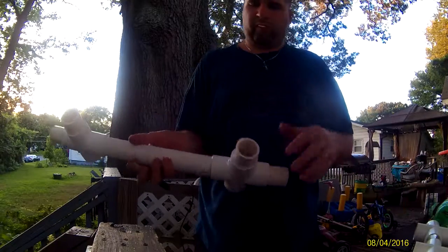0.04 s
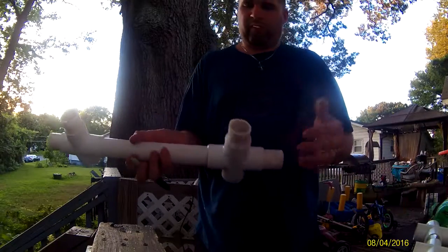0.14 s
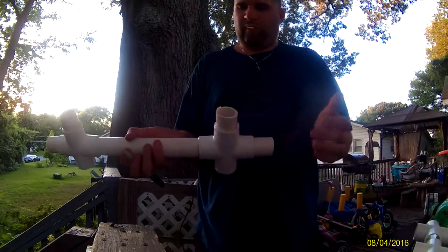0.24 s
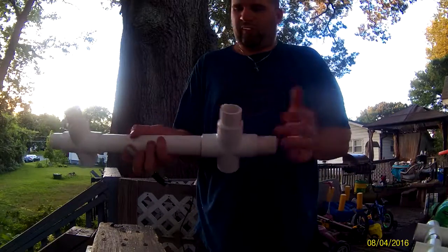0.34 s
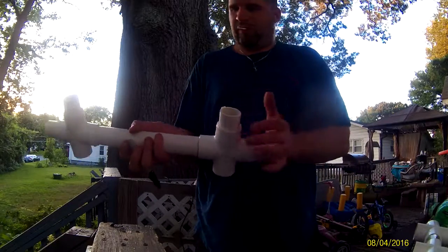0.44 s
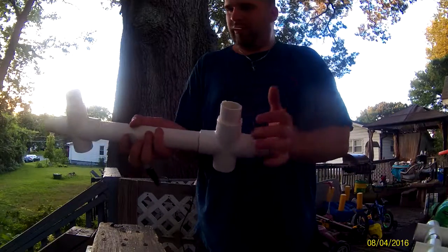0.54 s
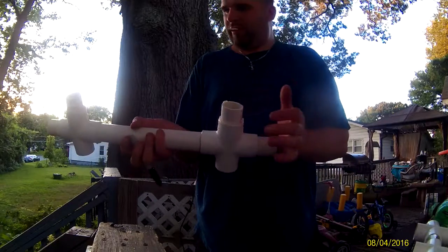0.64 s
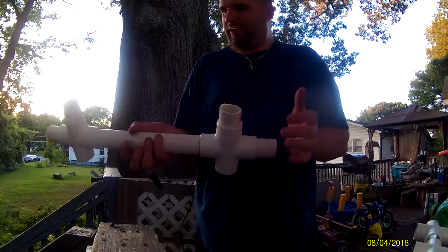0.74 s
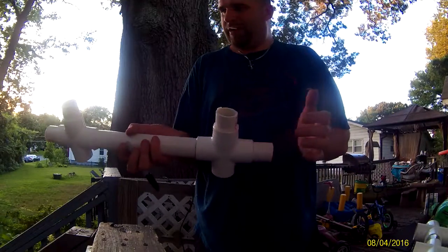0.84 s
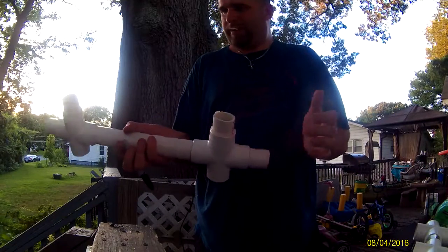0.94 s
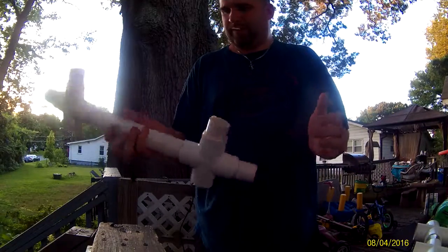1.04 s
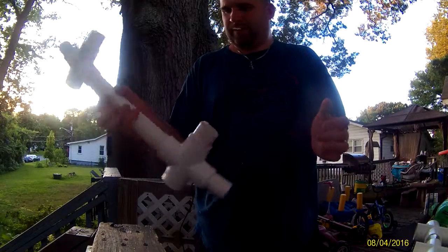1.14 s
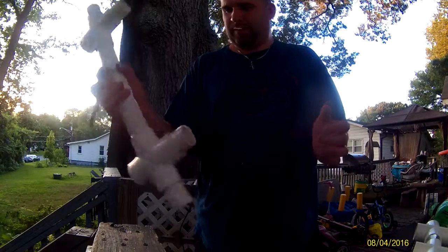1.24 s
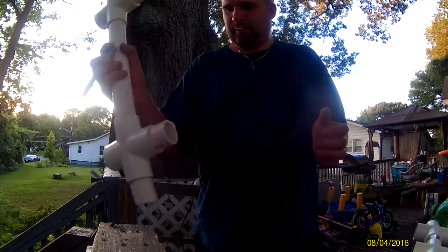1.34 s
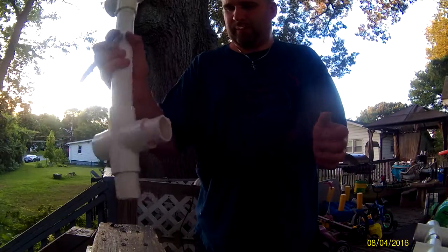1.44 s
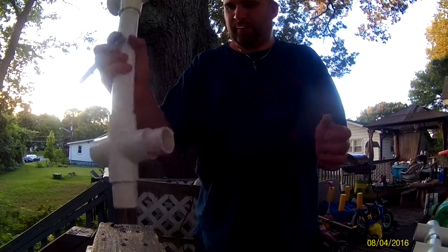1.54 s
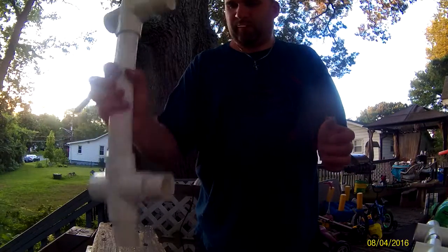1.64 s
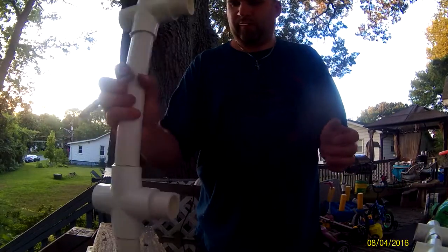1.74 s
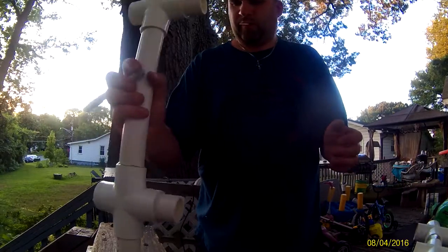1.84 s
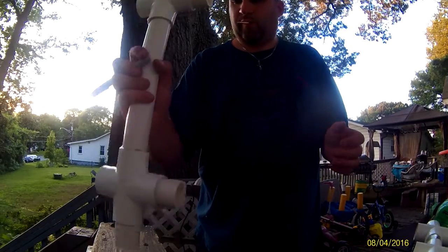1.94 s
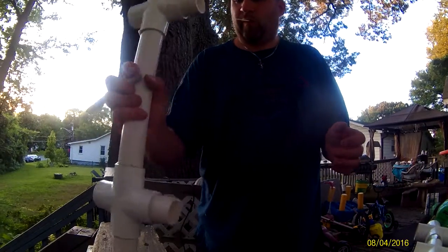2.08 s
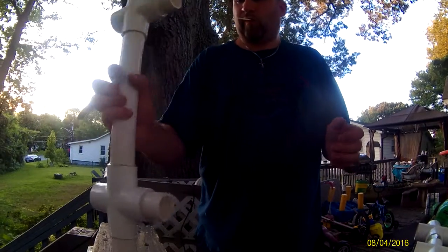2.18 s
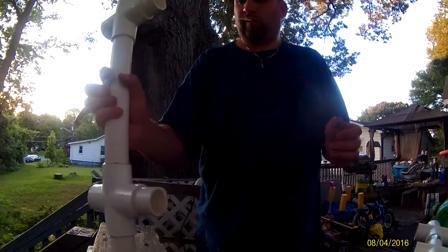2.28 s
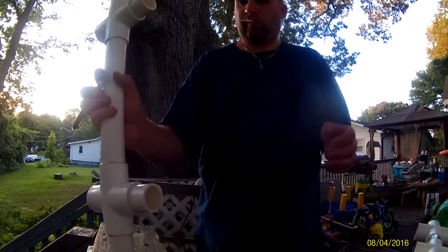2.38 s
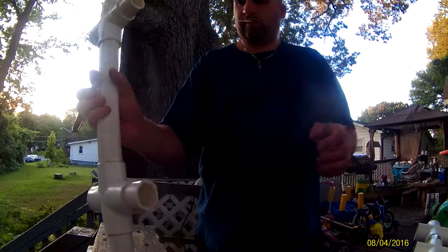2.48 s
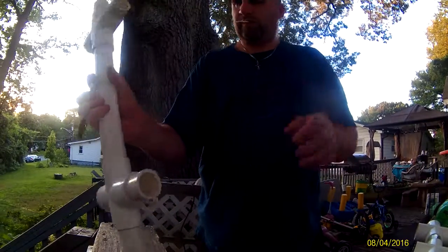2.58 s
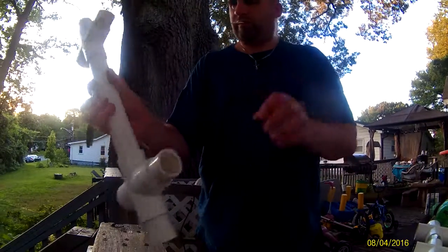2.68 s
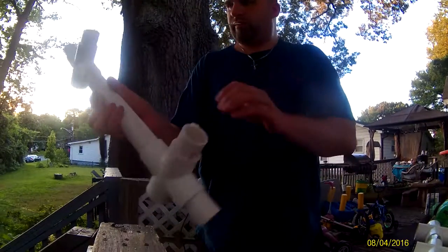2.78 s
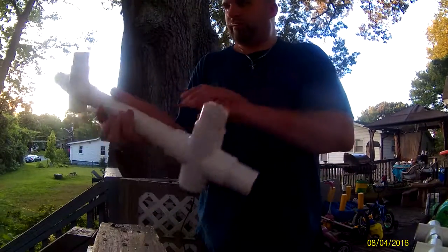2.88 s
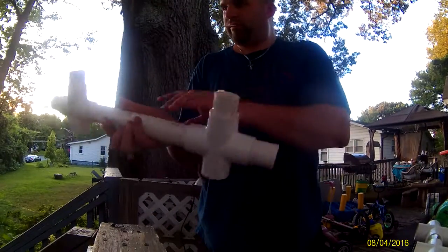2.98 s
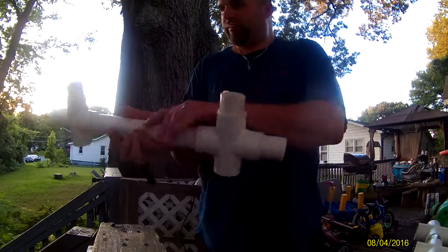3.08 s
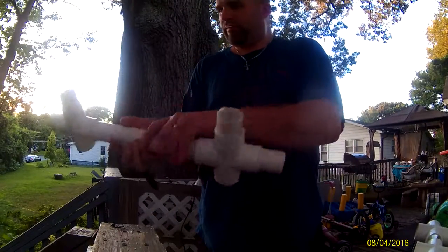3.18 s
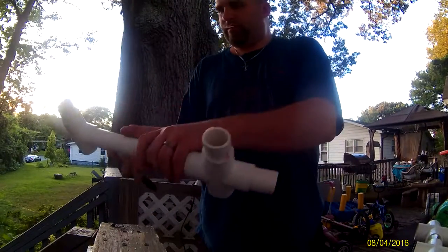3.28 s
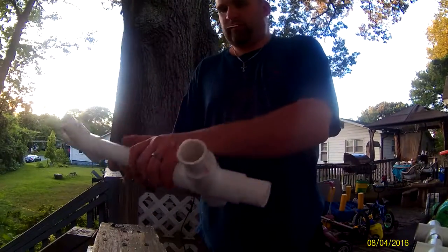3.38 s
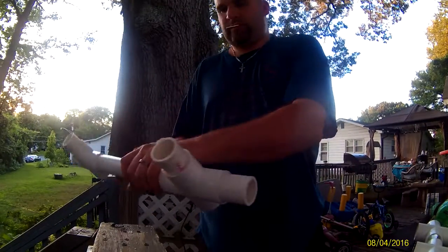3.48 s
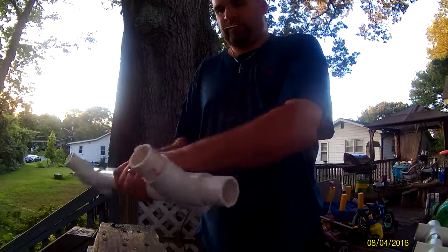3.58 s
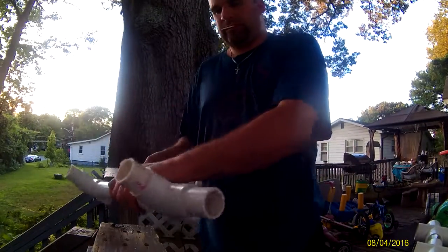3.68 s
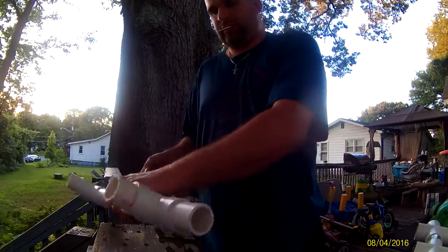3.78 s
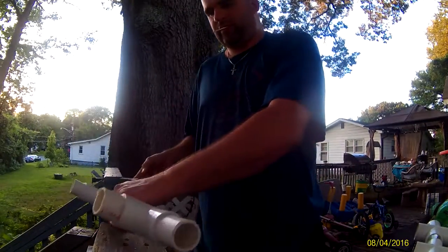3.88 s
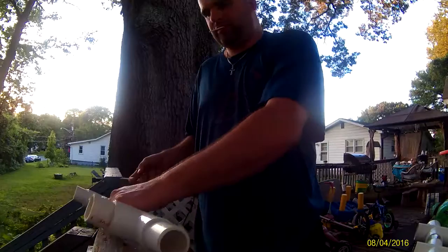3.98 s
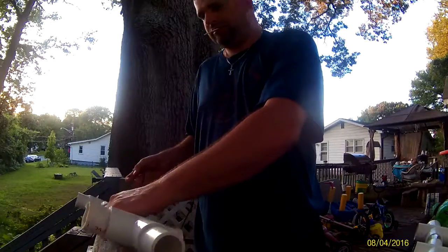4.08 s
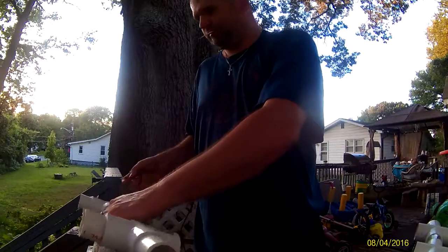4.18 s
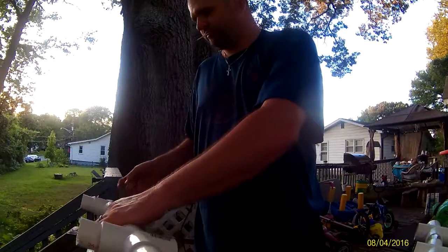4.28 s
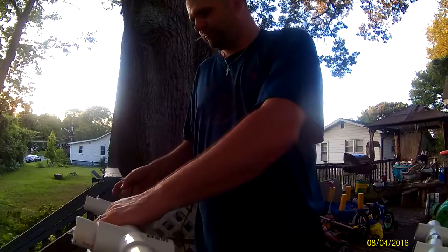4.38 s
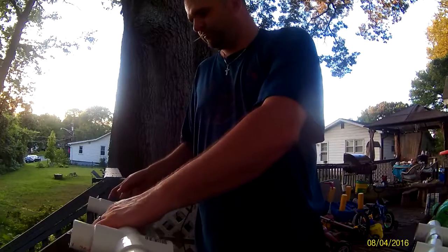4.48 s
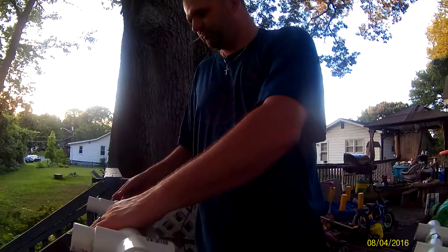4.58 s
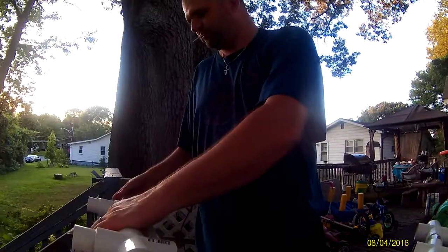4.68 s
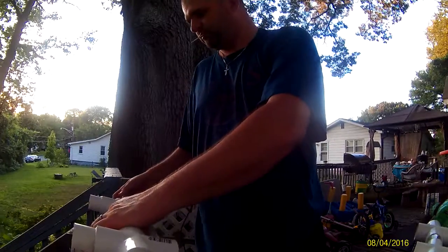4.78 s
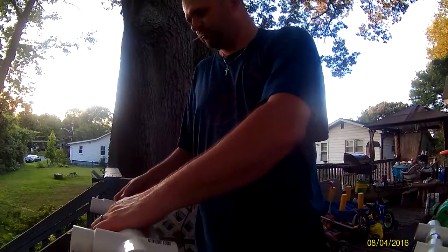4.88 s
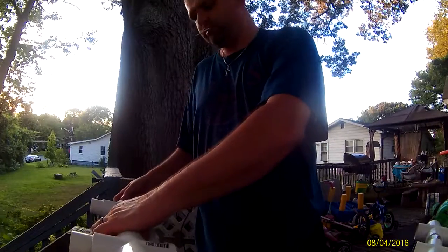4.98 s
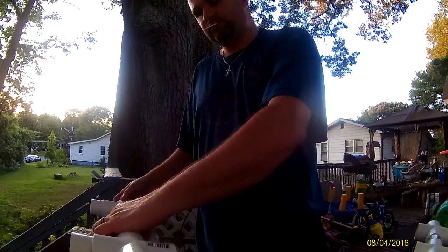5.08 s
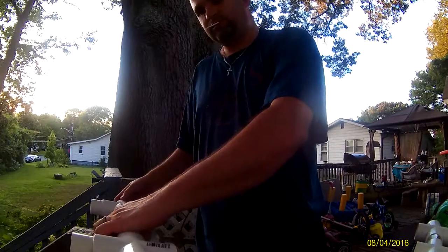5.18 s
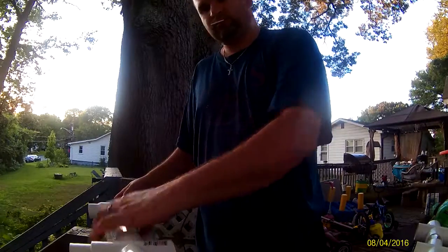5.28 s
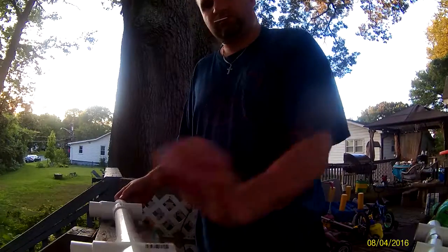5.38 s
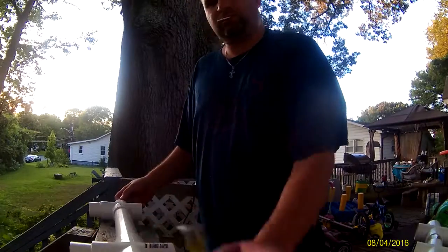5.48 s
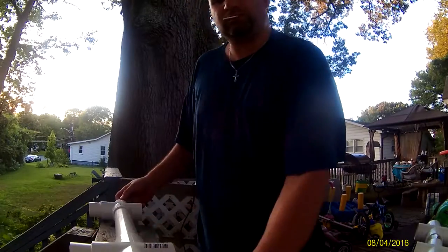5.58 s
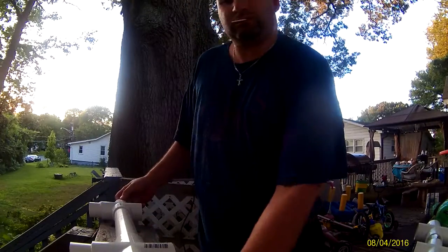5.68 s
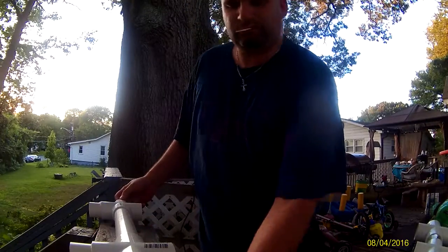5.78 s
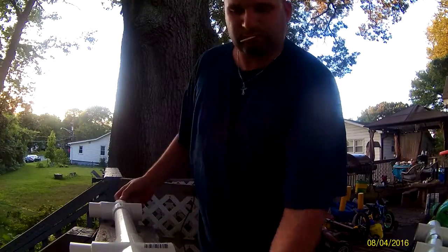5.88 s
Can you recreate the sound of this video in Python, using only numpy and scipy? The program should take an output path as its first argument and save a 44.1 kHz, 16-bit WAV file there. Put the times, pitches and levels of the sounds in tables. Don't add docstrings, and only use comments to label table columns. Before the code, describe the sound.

A hollow plastic pipe frame is patted, banged twice hard on a wooden bench, then laid down and nudged as thin plastic crinkles and insects sing.

```python
import sys
import numpy as np
from scipy import signal
from scipy.fft import rfft, irfft
from scipy.io import wavfile
from scipy.ndimage import uniform_filter1d

SR = 44100
rng = np.random.default_rng(int(sys.argv[2]) if len(sys.argv) > 2 else 0)


def natural_amplitude(level_db):
    exponent = np.asarray(level_db, float) / 20
    return 10 ** exponent


def dump_mix(stems):
    frames = np.atleast_2d(stems).T
    limited = np.clip(frames, -1, 1)
    pcm = np.round(limited * 32767).astype(np.int16)
    wavfile.write(sys.argv[1], SR, pcm)


N = 261557

# pitch_hz, level_db (per Hz)
YARD_COLOUR = [(12, -40), (20, -9.5), (58, 1), (146, -7.5), (248, -7.5), (293, -12), (642, -15.5),
               (897, -19.5), (1030, -20), (4940, -32), (6720, -23.5), (7520, -30.5), (9950, -31.5),
               (13500, -30), (16000, -34)]
# pitch_hz, width_hz, level_db
CHORUS_BANDS = [(6730, 520, 0), (5900, 800, -8.5)]
# throbs_per_s, first_crest_s, depth_db
THROBS = [
    (3.36, .29, 2.6),
    (2.65, .31, 1.3),
]
# start_s, length_s, pitch_hz, level_db
BUZZES = [
    (0.994, 0.15, 7100, -63.5),
    (1.335, .03, 7560, -68),
    (3.33, .06, 8330, -78),
    (3.901, 0.12056, 7460, -67.5),
]
# start_s, length_s, low_hollow_db, upper_hollow_db
DRAGS = [
    (4.81, 0.089, -53, -73),
    (5.06, 0.08, -65, -65.5),
    (5.2, 0.092, -54, -70.5),
    (5.46, 0.067, -58, -75),
    (5.54, 0.41, -64, -62.5),
    (5.79, 0.26, -45.5, -54.5),
]
# pitch_hz, width_hz, level_db
HOLLOWS = [
    [(161.4, 118, 0.5), (323, 47.15, -4), (420, 79, -2.5), (628, 253.4, -8)],
    [(1280, 72, 7.5), (1464, 230, 11.5)],
]
# start_s, peak_db, brightness_db (above 8 kHz), t60_s
CRINKLES = [(4.7852, -37, -2, 0.046), (4.9597, -53, 5.5, 0.022), (4.977, -31.5, -32, 0.043),
            (5.1323, -10.5, -29.5, 0.037), (5.1385, -33, -15, 0.036), (5.1616, -47, -7, 0.057),
            (5.1975, -44, -17.5, 0.043), (5.4545, -33.5, -35, 0.042), (5.5047, -46.5, 7.5, 0.052),
            (5.5267, -38, -8, 0.043), (5.5384, -40, 1.5, 0.038), (5.5475, -43.5, 8, 0.051),
            (5.5676, -39.5, 4.5, 0.04), (5.584, -34, 4, 0.028), (5.5968, -28.5, -1, 0.038),
            (5.628, -43, -9, 0.049), (5.6424, -42, -4.5, 0.11), (5.7079, -46.5, 1.5, 0.087),
            (5.8106, -29, -8, 0.099), (5.8286, -48.5, -18, 0.11), (5.8626, -32, -11.5, 0.13),
            (5.8844, -47, -1, 0.083), (5.9074, -55, 4, 0.0727), (5.9244, -57.5, 16, 0.02)]
# start_s, length_s, level_db
RUSTLES = [
    (5.12, 0.098, -47.5),
    (5.53, .2, -44.5),
    (5.72, 0.19, -56.5),
]
# pitch_hz, level_db (per Hz)
FILM_COLOUR = [(350, -2.5), (600, -14), (1130, -0.5), (1660, 1), (3210, -10.5), (6550, -24), (8740, -33),
               (15100, -32), (16000, -44)]
# start_s, peak_db, slap_db
PATS = [
    (0.4654, -28, -50.5),
    (0.4732, -48, -49),
]
# pitch_hz, level_db, t60_s
AIR_COLUMN = [(250, -6, .04), (447, 0, .25), (700, -2, .1), (900, -12, .05), (1152, -14, .1),
              (1400, -18, .04), (1700, -17, .04)]
# start_s, peak_db
CHATTER = [(1.7378, -15.5), (1.74, -32), (1.7428, -29), (1.7495, -23.5), (1.7558, -30), (1.761, -14.5),
           (1.7649, -21), (1.7674, -34), (1.7704, -34.5), (2.0873, -12.5), (2.0932, -5), (2.0985, -23.5),
           (2.1, -28.5), (2.1049, -33), (2.1084, -18.5), (2.1141, -46), (2.127, -24.5), (2.1354, -32.5),
           (2.1444, -43), (2.1474, -32), (2.1517, -36.5), (5.2747, -55), (5.2876, -50)]
# pitch_hz, level_db, t60_s
FITTING = [(3700, -6, .009), (4900, 0, .011), (5600, -4, .009), (6500, -4, .009), (8100, -2, .009),
           (9200, -8, .008), (10300, -8, .007), (11800, -10, .006)]
# start_s, level_db, colour_centre_hz
RINGINGS = [
    (1.74, -.7, 600),
    (2.1, -3, 840),
]
# pitch_hz, level_db, t60_s
PIPE_TONES = [(366, -19, .12), (450, -21, .2), (453, -45, 1.1), (643, -29, .6), (1335, -35, .45),
              (1685, -31, .2)]
# start_s, peak_db, colour_centre_hz, decay_factor, tick_db
BLOWS = [
    (1.7250, 14, 480, 0.41, -31),
    (1.7290, 14.5, 2105, 0.42, -21.5),
    (1.7370, 12.5, 896, 0.49, -27.5),
    (2.0765, 20, 796, 0.32, -27),
    (2.081, 18, 1200, .45, -20),
    (2.087, 11, 420, .3, -30),
    (2.0919, 11, 1030, 0.34, -25),
]
# start_s, peak_db, colour_centre_hz, decay_factor, tick_db
REBOUNDS = [(1.756, 4, 400, 0.54, -32), (1.764, -13, 393, 0.52, -31.5), (1.77, -8, 458, 0.93, -35),
            (2.111, -11, 425, .6, -26.5), (2.123, -25, 466.2, .6, -21), (2.133, 5, 948, .45, -32),
            (2.142, -18, 900, .55, -24.5), (2.145, 3, 670, 0.37, -45), (2.15, -13, 510, 1, -18),
            (2.171, -9.5, 665, 0.28, -48), (2.183, -12, 650, 0.32, -48)]
# start_s, peak_db, colour_centre_hz, decay_factor, tick_db
SETTLING = [
    (4.195, -21.5, 774, 0.59, -37),
    (4.455, -46, 315, 0.781, -28.5),
    (4.484, -33, 420, 0.48, -32),
    (4.501, -24.5, 482, 0.39, -36),
    (4.53, -42, 436, 0.72, -30),
    (4.648, -36.5, 350, 0.74, -38),
    (4.859, -40, 322.5, 0.39, -22),
]
# start_s, peak_db, colour_centre_hz, decay_factor, tick_db
NUDGES = [(4.95, -14.5, 910, 0.51, -35), (4.983, -19, 506, 0.73, -40), (5.007, -22.5, 435, 0.65, -39),
          (5.123, -13.5, 567, 0.81, -26), (5.128, -6, 306, 0.71, -23), (5.155, -26.5, 1400, 0.643, -28),
          (5.177, -14, 564, 0.24, -32), (5.19, -28.5, 700, .6, -28), (5.269, 1.6, 605, 0.44, -33.5),
          (5.276, -18.5, 540, 1, -27), (5.283, -3, 690, 0.39, -36), (5.358, -12, 442, .6, -34),
          (5.382, -18.5, 450.4, 0.77, -36), (5.433, -16, 420, 1, -56), (5.455, -18.5, 595, 0.35, -41),
          (5.543, -27, 381, 0.37, -31), (5.565, -36.5, 600, 0.54, -42), (5.826, -23, 425, 0.41, -33.5),
          (5.851, -24, 608, 0.63, -31), (5.865, -24, 900, 0.39, -20), (5.887, -42, 500, 0.38, -31),
          (5.916, -34, 400, 0.56, -40)]
# bench_thud_db, colour_fall_db (per octave squared)
CONTACTS = [
    (-23, 1.6),
    (-32, 3.4),
    (-28, 4.6),
    (-29, 4.2),
]
# pitch_hz, level_db
BODY = [(295, 0.5), (400, -2.34), (505, 3), (600, -0.5), (730, 1), (870, -4), (985, -5.5), (1120, -2.5),
        (1240, -1.5), (1510, -1.5), (1640, -1), (1780, -9.5), (2000, -7.5), (2200, -9.5), (2480, -3.5),
        (2750, -11.5), (3080, -13), (3600, -16), (4200, -18.5)]
# pitch_hz, level_db, t60_s
BENCH_THUD = [(142, 0, .22), (165, -3, .2), (200, -2, .1)]


def evened(x):
    return x / np.sqrt(np.mean(x ** 2) + 1e-20)


def read(points, hz):
    table_hz, value = np.transpose(points)
    return np.interp(np.log(hz + 1), np.log(table_hz + 1), value)


def add(mix, start_s, sound):
    part = mix[round(start_s * SR):][:len(sound)]
    part += sound[:len(part)]


def bands(x, table):
    out, n = np.zeros(len(x)), np.arange(len(x))
    for hz, width_hz, db in table:
        turn = np.exp(2j * np.pi * hz * n / SR)
        r = np.exp(-np.pi * width_hz / SR)
        smooth = signal.lfilter([1], np.convolve([1, -r], [1, -r]), x / turn)
        out += natural_amplitude(db) * evened((turn * smooth).real)
    return evened(out)


def modes(table, length_s, shift_db=0, detune=1, phase=0):
    hz, db, t60 = (column[:, None] for column in np.transpose(table))
    t = np.arange(round(length_s * SR)) / SR
    tones = np.sin(2 * np.pi * (hz * detune * t + phase))
    sound = (natural_amplitude(db + shift_db - 60 * t / t60) * tones).sum(0)
    return sound / abs(sound).max()


def soft_start(sound, rise_s):
    return sound * np.minimum(np.arange(len(sound)) / (rise_s * SR), 1)


def crack(top_hz, t60):
    t = np.arange(900) / SR
    band = signal.butter(2, [1500, min(top_hz, 16000)], "band", fs=SR)
    return evened(signal.lfilter(*band, rng.standard_normal(len(t)))) * natural_amplitude(-60 * t / t60)


def strokes(rows, column):
    gain = np.zeros(N)
    for row in rows:
        add(gain, row[0], natural_amplitude(row[column]) * signal.windows.tukey(round(row[1] * SR), 0.63))
    return gain


def yard():
    frames, hz = N // 256 + 5, np.fft.rfftfreq(1024, 1 / SR)
    a, b, patches = rng.standard_normal((frames, 513, 3)).T
    patches = evened(uniform_filter1d(uniform_filter1d(patches, 10, 0), 12, 1))
    without_insects_hz = np.where(abs(hz - 6500) < 1300, 8500, hz)
    colour_db = np.minimum(read(YARD_COLOUR, hz), read(YARD_COLOUR, without_insects_hz) + 0.83)
    treble_db = 3.7 * (hz[:, None] / 16000) ** 2.9
    z = (a + 1j * b) * natural_amplitude(colour_db[:, None] + treble_db + .8 * patches)
    return natural_amplitude(-56.5) * evened(signal.istft(z, nperseg=1024, noverlap=768)[1][:N])


def insects():
    t = np.arange(N) / SR
    clicks = rng.standard_normal(N) * (0.65 + (rng.random(N) < 1500 / SR) * 0.62)
    throb_db = sum(db * np.cos(2 * np.pi * rate_hz * (t - crest_s)) for rate_hz, crest_s, db in THROBS)
    chorus_db = -66
    out = bands(clicks, CHORUS_BANDS) * natural_amplitude(chorus_db + throb_db)
    for start_s, length_s, hz, db in BUZZES:
        n = round(length_s * SR)
        buzz = bands(rng.standard_normal(n), [(hz, 450, 0), (0.84 * hz, 900, -4)])
        add(out, start_s, natural_amplitude(db) * buzz * signal.windows.tukey(n, .4))
    return out


def whine():
    whine_hz, flip_hz, whine_db = 13364, 41, -65.5
    t = np.arange(N) / SR
    waver = 2.5 * np.cumsum(evened(uniform_filter1d(rng.standard_normal(N), 3000))) / SR
    flips = uniform_filter1d(np.sign(np.sin(2 * np.pi * flip_hz * t)), 30)
    return natural_amplitude(whine_db + 3) * flips * np.sin(2 * np.pi * (whine_hz * t + waver))


def drag():
    out = np.zeros(N)
    for column, hollow in enumerate(HOLLOWS, 2):
        slips = rng.standard_normal(N) * (rng.random(N) < 500 / SR)
        slips += 0.038 * rng.standard_normal(N)
        out += natural_amplitude(5.5) * bands(slips, hollow) * strokes(DRAGS, column)
    return out


def bag():
    unevenness = evened(uniform_filter1d(rng.exponential(1, N) - 1, 40))
    snaps = rng.standard_normal(N) * natural_amplitude(7.5 * unevenness / 2)
    hz = np.fft.rfftfreq(N, 1 / SR)
    film = rfft(snaps) * natural_amplitude(read(FILM_COLOUR, hz))
    upper = 1 / (1 + (8000 / (hz + 1)) ** 4)
    low = evened(irfft(film * (1 - upper), N))
    high = evened(irfft(film * upper, N))
    low_gain, high_gain, t = np.zeros(N), np.zeros(N), np.arange(6000) / SR
    for start_s, db, bright_db, t60 in CRINKLES:
        burst = soft_start(natural_amplitude(db - 7.5 - 60 * t / max(t60, .01)), 0.00107)
        add(low_gain, start_s, burst)
        add(high_gain, start_s, burst * natural_amplitude(bright_db + 10.0))
    rustle = strokes(RUSTLES, column=2)
    return low * (low_gain + natural_amplitude(-13.5) * rustle) + high * (high_gain + natural_amplitude(-9.5) * rustle)


def pats():
    out = np.zeros(N)
    for start_s, db, slap_db in PATS:
        add(out, start_s, natural_amplitude(db + 2) * soft_start(modes(AIR_COLUMN, .4), .004))
        slap = crack(3000, 0.03) + 0.54 * crack(13000, 0.021)
        add(out, start_s - .0015, natural_amplitude(slap_db) * slap)
    return out


def chatter():
    out = np.zeros(N)
    for (start_s, db), z in zip(CHATTER, rng.standard_normal((30, len(FITTING), 3))):
        tap = modes(FITTING, .03, 0.83 * z[:, :1], 1 + 0.025 * z[:, 1:2], 0.49 * z[:, 2:])
        add(out, start_s, natural_amplitude(db + 6.0) * tap)
    return out


def ring():
    out = np.zeros(N)
    for start_s, db, centre_hz in RINGINGS:
        for tone in PIPE_TONES:
            fall_db = 6 * np.log2(tone[0] / centre_hz) ** 2
            add(out, start_s, natural_amplitude(db + tone[1] - fall_db) * modes([tone], .9))
    return out


def knocks():
    out = np.zeros(N)
    hz, level_db = np.transpose(BODY + BODY)
    luck = rng.standard_normal((60, len(hz), 3))
    kinds = zip([BLOWS, REBOUNDS, SETTLING, NUDGES], CONTACTS)
    hits = [row + contact for rows, contact in kinds for row in rows]
    for (start_s, db, centre_hz, decay, tick_db, thud_db, fall_db), z in zip(hits, luck):
        start_s += .0013
        colour_db = level_db - fall_db * np.log2(hz / centre_hz) ** 2
        t60 = decay * 0.14 * (300 / hz) ** 0.5
        table = np.transpose([hz, colour_db, t60])
        body = modes(table, .25, 4.0 * z[:, :1], 1 + 0.036 * z[:, 1:2], 0.16 * z[:, 2:])
        add(out, start_s, natural_amplitude(db) * soft_start(body, 0.0022))
        add(out, start_s, natural_amplitude(.55 * db + thud_db) * modes(BENCH_THUD, .4))
        add(out, start_s + 0.00052, natural_amplitude(db + tick_db) * crack(6600, 0.012))
    return out


def reflections(near):
    t = np.arange(20000) / SR
    taps = rng.standard_normal(20000) * (rng.random(20000) < .04) * (t > .003)
    bench, far_yard = natural_amplitude(-60 * t / 0.055), natural_amplitude(-40.5 - 60 * t / 0.56)
    echo = taps * (bench + far_yard) / np.sqrt(12)
    dull_echo = signal.lfilter(*signal.butter(2, 1500, fs=SR), echo)
    return natural_amplitude(-9.0) * signal.oaconvolve(near, dull_echo)[:N]


def scene():
    background = yard() + insects() + whine()
    near = drag() + bag() + knocks()
    near = signal.lfilter(*signal.butter(2, 120, "high", fs=SR), near)
    return (background + near + reflections(near) + pats() + chatter() + ring())[None]


def top_cut(x):
    return signal.sosfilt(signal.butter(12, 16600, fs=SR, output="sos"), x)


def record(dry):
    ceiling, block_s, first_s = .715, .02, .017
    clipped = dry[0] / (1 + (dry[0] / ceiling) ** 12) ** (1 / 12)
    edges = np.arange(first_s, N / SR, block_s)
    peaks = np.maximum.reduceat(abs(clipped), (edges * SR).astype(int))
    gain_db = np.zeros(len(edges))
    for k in range(1, len(edges)):
        overloaded = peaks[k - 1] * natural_amplitude(gain_db[k - 1]) > .55
        recovery_db = 5 if peaks[k - 1] < .6 else 0
        gain_db[k] = -8.5 if overloaded else min(gain_db[k - 1] + recovery_db, 0)
    block = np.maximum(np.searchsorted(edges, np.arange(N) / SR) - 1, 0)
    levelled = clipped * natural_amplitude(uniform_filter1d(gain_db[block], 30))
    smooth = signal.lfilter([.55], [1, -.45], levelled)
    edge = signal.firwin(767, 15880, window=("kaiser", 8), fs=SR)
    smooth = signal.oaconvolve(smooth, edge, "same")
    finished = signal.lfilter([1, -1], [1, -.998], smooth)
    return top_cut(finished[None])


dry = scene()
out = record(dry)
dump_mix(out)
```